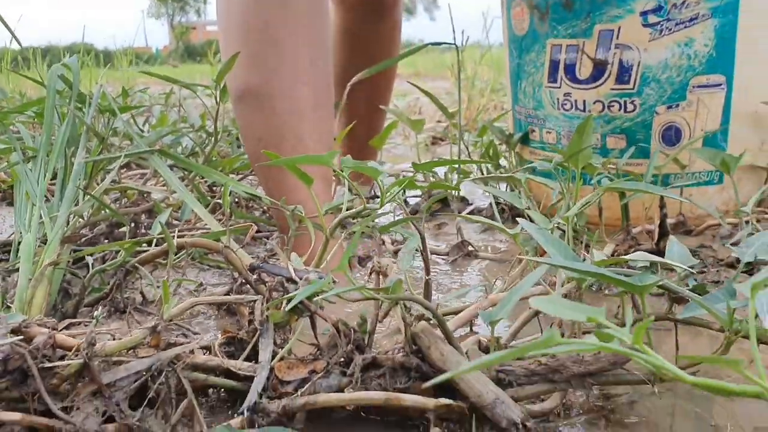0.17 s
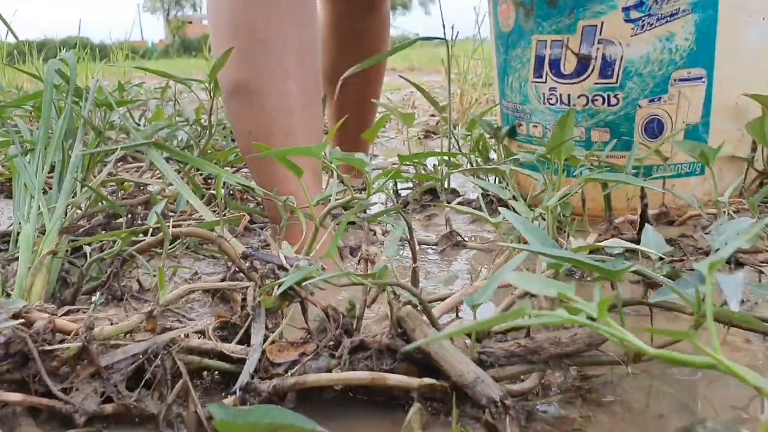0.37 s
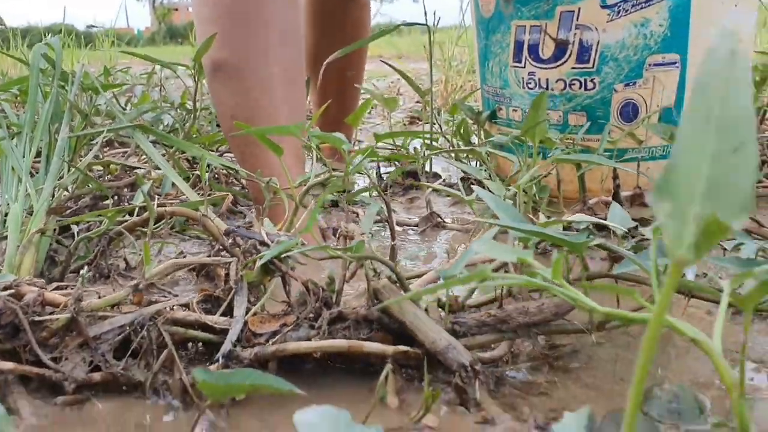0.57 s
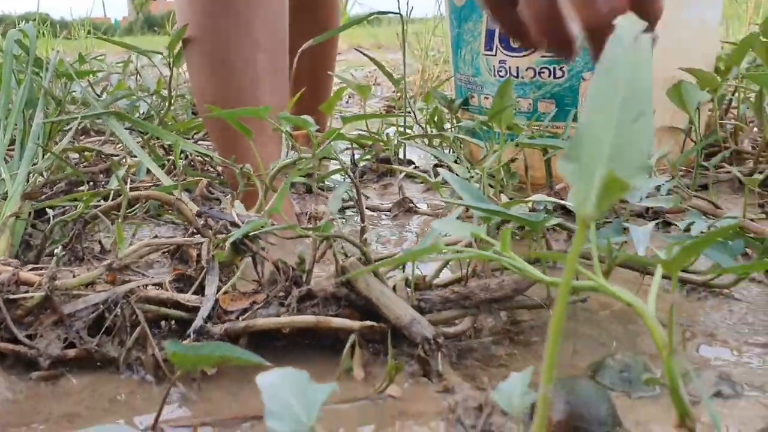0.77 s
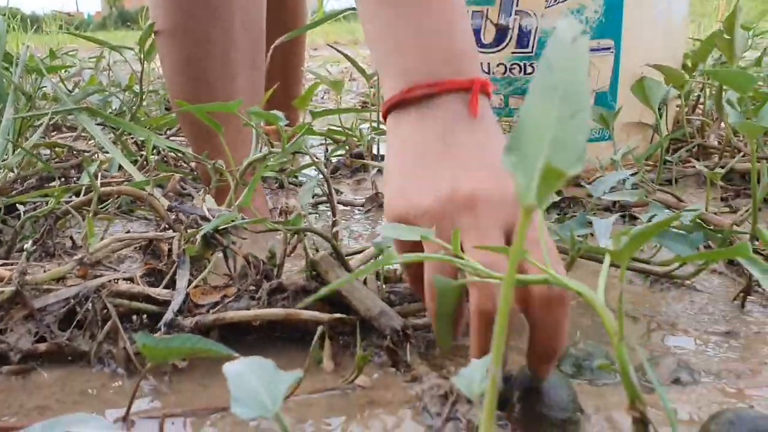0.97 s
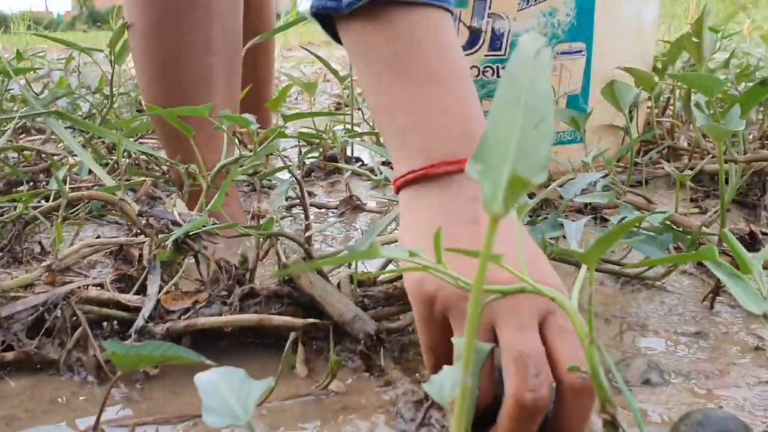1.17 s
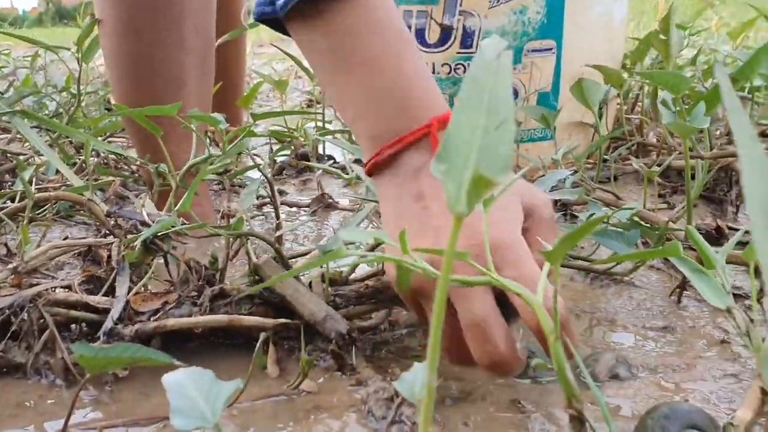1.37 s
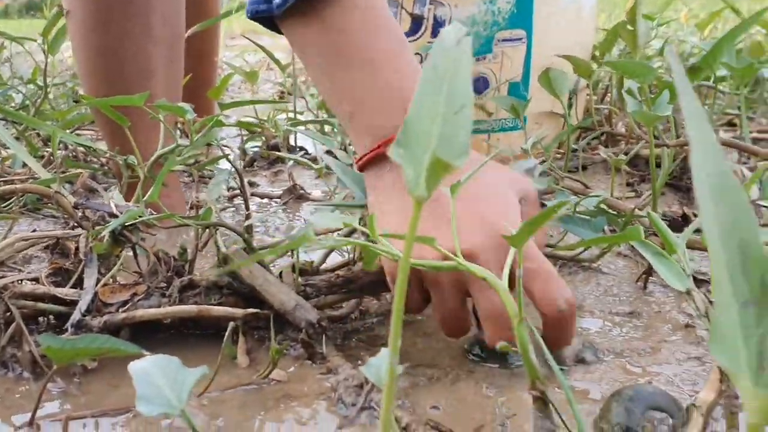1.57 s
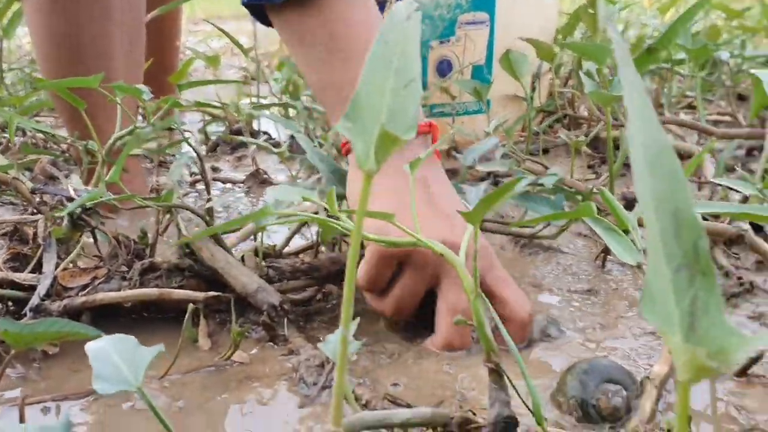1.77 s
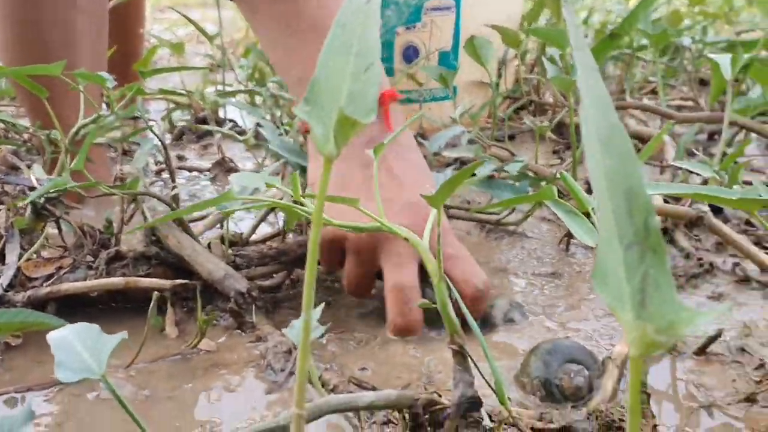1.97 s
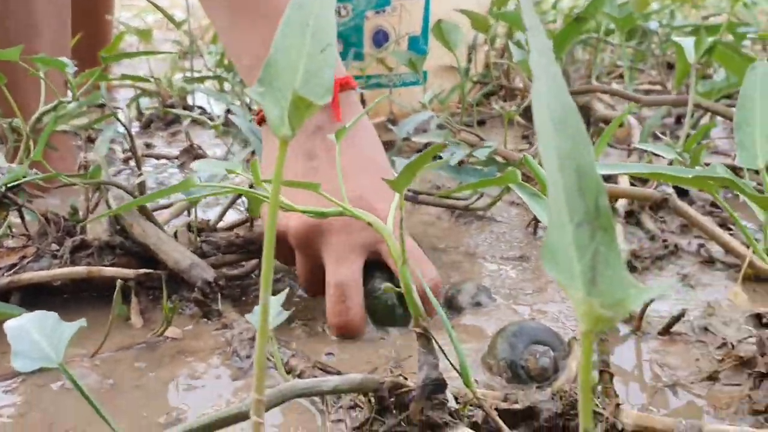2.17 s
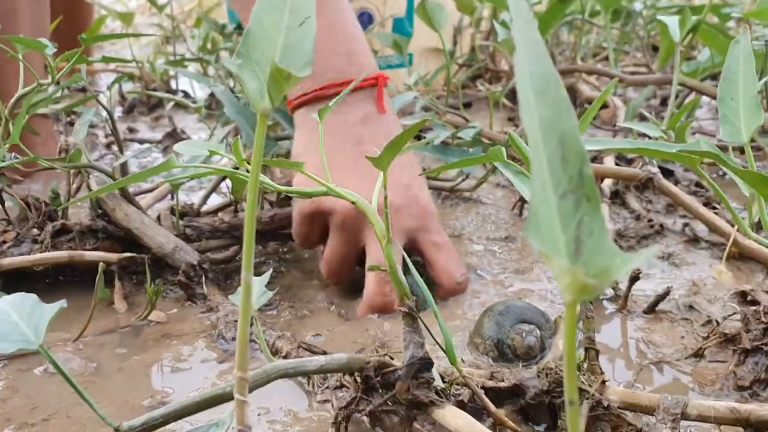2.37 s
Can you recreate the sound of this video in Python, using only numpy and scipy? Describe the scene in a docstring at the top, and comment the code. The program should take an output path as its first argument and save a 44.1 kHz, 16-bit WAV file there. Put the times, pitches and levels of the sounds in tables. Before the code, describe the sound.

A hand plunges into shallow muddy water with one short hollow splash, over low outdoor rumble

```python
"""A low rumble, open-air hiss and a faint pulsing insect lie under the fine rustle of wet mud and stalks.
Close to the ground, a hand makes one short splash in shallow muddy water: hollow falling sine plops,
noise slaps and gushes of spray. Then the fingers stir the mud, which ticks and lets go small bubbles.
Steady beds and wet grit are coloured noise and clicks; plops, low bumps, pings, bubbles and droplets
are sines."""
import sys
import numpy as np
from scipy import signal
from scipy.fft import rfft, irfft
from scipy.io import wavfile
from scipy.ndimage import uniform_filter1d

SR = 44100
rng = np.random.default_rng(int(sys.argv[2]) if len(sys.argv) > 2 else 0)


def log_audio(samples):
    """Write samples as a 16-bit WAV file to the path given in sys.argv[1]."""
    # one column per channel
    frames = np.atleast_2d(samples).T
    # limit to full scale, then quantise
    limited = np.clip(frames, -1, 1)
    pcm = np.round(limited * 32767).astype(np.int16)
    wavfile.write(sys.argv[1], SR, pcm)


N = 105840
T = np.arange(N) / SR
OPPOSITE = np.array([[1], [-1]])  # left and right in opposite polarity
WIDE_LIKENESS = 0.05  # left-right correlation of air, rustle and spray
PLOP_PAN_DB, WET_PAN_DB, FIELD_PAN_DB = -4, -1.5, -3  # left level minus right level
LARGE_SWELL_S = 0.0049  # onset of the plops and of the larger bubble


def from_db(db):
    """Turn decibels into gain."""
    return 10 ** (np.asarray(db) / 20)


def rms_one(x):
    """Scale to unit rms."""
    return x / np.sqrt(np.mean(x ** 2) + 1e-20)


def pan(db):
    """Give left and right gains for a level difference; positive leans left."""
    return from_db(db * OPPOSITE / 2)


def spread(pair, likeness):
    """Blend two unrelated signals into a left and right with the given correlation."""
    shared = np.sqrt(1 + likeness) * pair[0]
    apart = np.sqrt(1 - likeness) * pair[1] * OPPOSITE
    return (shared + apart) / np.sqrt(2)


def band(x, low_hz, high_hz):
    """Pass a band with gentle slopes."""
    return signal.sosfilt(signal.butter(2, [low_hz, high_hz], "band", fs=SR, output="sos"), x)


def colour(x, points):
    """Shape a steady signal's spectrum, falling away beyond the end points; rms 1."""
    hz, db = np.transpose(points)
    log_hz = np.log(np.maximum(np.arange(N // 2 + 1) * SR / N, 1))
    below = np.maximum(np.log(hz[0]) - log_hz, 0)
    above = np.maximum(log_hz - np.log(hz[-1]), 0)
    curve_db = np.interp(log_hz, np.log(hz), db) - 14.0 * (below + above)
    return rms_one(irfft(rfft(x) * from_db(curve_db), N))


def dying(t, t60):
    """Decay exponentially by 60 dB in t60 seconds, held at 1 before t = 0."""
    return np.exp(-np.log(1000) * np.maximum(t, 0) / t60)


def add(out, start_s, sound):
    """Mix a sound in at its start time."""
    i = int(start_s * SR)
    out[:, i:i + sound.shape[-1]] += sound[..., :N - i]


def noise_pair():
    """Make two unrelated white noises."""
    return rng.standard_normal((2, N))


def grains(per_s):
    """Make two trains of random clicks of uneven size and either polarity."""
    extra_db = 2 * np.minimum(rng.exponential(1, (2, N)), 5)
    sizes = from_db(extra_db) * rng.choice([-1, 1], (2, N))
    return sizes * (rng.random((2, N)) < per_s / SR)


def droplets(per_s, low_hz, high_hz, level_db):
    """Ring tiny sine droplets at random times, each with its own size, pitch and stereo phase."""
    out, t = np.zeros((2, N)), T[:SR // 40]
    for when, pitch, size, side in rng.random((int(per_s * N / SR), 4)):
        hz = low_hz * (high_hz / low_hz) ** pitch
        ring = np.sin(2 * np.pi * hz * t + side * OPPOSITE)
        add(out, when * T[-1], size ** 2 * ring * dying(t, 16 / hz))  # 60 dB down in 16 cycles
    return from_db(level_db) * rms_one(out)


def spatter(size):
    """Scatter separate drop impacts in a little hiss, left and right."""
    impacts_per_s, impact_share = 2500, 0.73
    hits = rng.random((2, size)) < impacts_per_s / SR
    impacts = rms_one(rng.standard_normal((2, size)) * hits)
    hiss = rng.standard_normal((2, size))
    return spread(impact_share * impacts + (1 - impact_share) * hiss, likeness=0.057)


# spectrum of the low rumble: frequency_hz, relative density_db (per Hz)
RUMBLE_SPECTRUM = [(12, -53), (25, -21), (38, -8.5), (53, 2.5), (80, -1), (118, 0.5), (150, -6), (180, -19),
                   (260, -23.5), (400, -21.5), (600, -83)]
# spectrum of the wide hush: frequency_hz, relative density_db (per Hz)
HUSH_SPECTRUM = [(300, -2), (365, 6), (560, 3.5), (950, -3), (1500, -14.5)]
# spectrum of the open air: frequency_hz, relative density_db (per Hz)
AIR_SPECTRUM = [(250, 0.5), (400, 3.5), (600, -4.5), (950, -13.5), (1500, -16.5), (3000, -18.5),
                (5500, -22.5), (8500, -21), (11500, -24.5), (15000, -31)]


def field():
    """Three steady coloured noises: a nearly central rumble, wide air, and a hush opposite in the ears."""
    rumble_db, hush_db, air_db = -42.5, -57, -56.5
    rumble = from_db(rumble_db) * colour(spread(noise_pair(), likeness=0.97), RUMBLE_SPECTRUM)
    hush = from_db(hush_db) * colour(rng.standard_normal(N), HUSH_SPECTRUM) * OPPOSITE
    air = from_db(air_db) * colour(spread(noise_pair(), WIDE_LIKENESS), AIR_SPECTRUM)
    return rumble + hush + air


# two insect notes: pitch_hz, width_hz, level_db (before pulsing and swell), time of one pulse_s,
# pulsing depth (0-1)
INSECT_NOTES = [(9380, 310, -67.5, 1.4, 0.54), (10300, 130, -68.5, 2.14, 1)]


def insect():
    """Two very high narrow noise bands pulse at one rate, growing slowly louder, then holding level."""
    period_s, swell_db_per_s, loudest_s = 0.104, 6.5, 2.2
    out = np.zeros((2, N))
    for pitch_hz, width_hz, level_db, pulse_s, depth in INSECT_NOTES:
        beat = np.cos(2 * np.pi * (T - pulse_s) / period_s)
        dip = 0.5 - 0.5 * np.tanh(2 * beat)
        note = rms_one(band(noise_pair(), pitch_hz - width_hz / 2, pitch_hz + width_hz / 2))
        out += from_db(level_db) * (1 - depth * dip) * note
    return out * from_db(swell_db_per_s * np.minimum(T - loudest_s, 0))


# level of the wet mud and stalks over time: time_s, level_db (of the crackle before panning)
RUSTLE_LEVEL = [(0, -53.5), (.07, -54.5), (.12, -44.5), (.2, -51.5), (.215, -52), (.35, -49), (.41, -52),
                (.48, -47), (.54, -56.5), (.66, -53.5), (.8, -62.5), (1.22, -65), (1.36, -55.5),
                (1.55, -62.5), (1.73, -56.5), (1.83, -64.5), (1.94, -55.5), (2.07, -59.5), (2.4, -73.5)]
# spectrum of the crackle: frequency_hz, relative density_db (per Hz)
RUSTLE_SPECTRUM = [(300, 13), (700, 12.5), (1500, 0.5), (4500, -1.5), (7500, -1), (10000, -8.5),
                   (15000, -11)]


def rustle():
    """Mud and stalks crackle in fine coloured clicks with a trickle of ringing droplets."""
    crackle = colour(spread(grains(per_s=2200), WIDE_LIKENESS), RUSTLE_SPECTRUM)
    trickle = droplets(per_s=74, low_hz=1200, high_hz=8006, level_db=-11.5)  # against the crackle
    level = from_db(np.interp(T, *np.transpose(RUSTLE_LEVEL)))
    return level * (crackle + trickle)


# crisp snaps of stalks and mud: start_s, level_db (before decay and panning)
SNAPS = [(0.065, -47), (0.199, -41), (0.2342, -38.5), (.5050, -43), (0.63, -52), (1.74, -46.5),
         (1.925, -52), (2.23, -52)]


def snaps():
    """Tiny bright cracks: band-passed spatter dying at once."""
    out, t = np.zeros((2, N)), T[:SR // 20]
    for start_s, level_db in SNAPS:
        crack = rms_one(band(spatter(len(t)), low_hz=1500, high_hz=8550))
        add(out, start_s, from_db(level_db) * crack * dying(t, t60=0.034))
    return out * pan(WET_PAN_DB)


# soft low bumps: start_s, peak_db (before panning), pitch_hz
BUMPS = [(0.202, -31.5, 75.4), (0.426, -27.5, 115), (0.482, -30.5, 87), (0.507, -29, 75.5)]


def bumps():
    """A few cycles of low pressure, swelling and fading in a 30 ms bell shape."""
    out, t = np.zeros((2, N)), T[:int(0.03 * SR)]
    for start_s, peak_db, pitch_hz in BUMPS:
        add(out, start_s, from_db(peak_db) * np.hanning(len(t)) * np.sin(2 * np.pi * pitch_hz * t))
    return out * pan(PLOP_PAN_DB)


# wet slaps and ticks: start_s, level_db (before shaping and panning), centre_hz, t60_s
SLAPS = [(0.2314, -24.5, 2430, 0.032), (0.2736, -26, 1660, 0.066), (0.2743, -10.5, 720, 0.023),
         (0.297, -18, 1310, 0.072), (0.3024, -23, 1820, 0.053), (0.306, -20, 2340, 0.042),
         (0.3157, -19.5, 1980, 0.05), (0.3218, -19, 1980, 0.0093), (0.3333, -31.5, 1350, 0.091),
         (0.353, -31.5, 1940, 0.038), (.3590, -9.5, 474, 0.012), (0.364, -36.5, 2600, 0.037),
         (0.4209, -18.5, 840, 0.024), (0.421, -41.5, 2620, 0.083), (0.5038, -38, 1060, 0.017),
         (1.03, -51, 620, 0.019), (0.568, -44, 890, 0.088), (0.607, -47, 756, 0.3),
         (0.636, -49, 1470, 0.019), (0.675, -55, 1710, .02), (0.751, -48.5, 1690, 0.015),
         (.7525, -39, 504, 0.05), (1.7259, -27.5, 385, 0.012), (1.725, -40.5, 3300, 0.026),
         (1.739, -42.5, 3280, 0.043), (1.9610, -42.5, 1090, 0.016), (2.144, -48.5, 2500, 0.016),
         (2.203, -46, 2140, 0.014)]


def slaps():
    """Each wet contact is a short noise burst with a weak wash behind it, softened in the treble."""
    half_width, rise_s = 1.347, 0.00049  # half width as a frequency ratio
    wash_db, wash_t60_s = -22, 0.28
    out, t = np.zeros((2, N)), T[:SR // 4]
    soften = signal.butter(3, 3730, fs=SR, output="sos")
    for start_s, level_db, centre_hz, t60_s in SLAPS:
        noise = band(spatter(len(t)), centre_hz / half_width, centre_hz * half_width)
        noise = rms_one(signal.sosfilt(soften, noise))
        # even out the level so that the envelope alone shapes the burst
        power = uniform_filter1d(np.mean(noise ** 2, axis=0), size=300)
        noise = noise / np.sqrt(power + 1e-9)
        burst = dying(t - 2 * rise_s, t60_s)
        wash = from_db(wash_db) * dying(t, wash_t60_s)
        shape = np.minimum(t / rise_s, 1) * (burst + wash)
        add(out, start_s, from_db(level_db) * noise * shape)
    return out * pan(WET_PAN_DB)


# hollow plops: start_s, level_db (before panning), pitch_hz (settled), t60_s,
# overtones_db (offset for the ring table), fall_hz (starting pitch above the settled one)
PLOPS = [(0.233, -27.5, 277, 0.013, -19.5, 109), (0.2747, -6, 276, 0.058, -20, 350),
         (.2880, -13, 220.6, 0.19, -24, -2), (0.2972, -22, 224, 0.09, -17, 93),
         (0.3156, -10, 235.8, 0.12, -6, 180), (0.3602, -7.5, 227, 0.093, -15, 98),
         (.4230, -5.5, 241, 0.033, -19, 284), (0.441, -27, 239, 0.073, -32.5, -11),
         (0.456, -21, 235, 0.056, -40, 2), (.5040, -31, 240, 0.044, -33.5, 100),
         (0.544, -28, 238, 0.048, -37, 100), (.5590, -21.5, 229.6, 0.12, -32, 219),
         (0.6, -21, 226, 0.038, -39, 114), (.6340, -30.5, 225, 0.063, -41, 104),
         (0.7511, -44.5, 253, 0.058, -41.5, 102), (.7970, -35.5, 234, 0.073, -46, 297),
         (0.935, -42.5, 236, 0.074, -55, -2)]
# overtones of the hollow: pitch_hz, level_db (added to overtones_db), t60_s
OVERTONES = [(562, 1.5, 0.048), (646, 2, 0.011), (701.6, -11.5, 0.12), (826, -10, 0.035),
             (989, -16.5, 0.087), (1080, -15.5, 0.087), (1169, -15.5, 0.075), (1507, -20, 0.078),
             (1756, -21.5, 0.037)]


def plops():
    """Each plop glides quickly onto a low hollow note and sets the overtones ringing."""
    glide_s, left_lag_s, overtone_rise_s = 0.0015, 0.000054, 0.0011
    out, t = np.zeros((2, N)), T[:SR // 4]
    ear_t = t - np.array([[left_lag_s], [0]])
    for start_s, level_db, pitch_hz, t60_s, overtones_db, fall_hz in PLOPS:
        glide_cycles = fall_hz * glide_s * (1 - np.exp(-t / glide_s))
        cycles = pitch_hz * ear_t + glide_cycles
        swell = np.minimum(t / LARGE_SWELL_S, 1) * dying(t - LARGE_SWELL_S, t60_s)
        sound = from_db(level_db) * swell * -np.sin(2 * np.pi * cycles)
        for mode_hz, mode_db, mode_t60_s in OVERTONES:
            # the ears' phases differ less below 760 Hz
            apart = rng.uniform(-1.24, 0.7) * min(mode_hz / 760, 1) * OPPOSITE
            ring = np.sin(2 * np.pi * (mode_hz * t + rng.random()) + apart)
            envelope = dying(t, mode_t60_s) * np.minimum(t / overtone_rise_s, 1)
            gain = from_db(overtones_db + mode_db + rng.normal(0, 1))
            sound = sound + gain * ring * envelope
        add(out, start_s, sound)
    return out * pan(PLOP_PAN_DB)


# small wet pings and bubbles: start_s, peak_db (before onset, decay and panning),
# pitch_hz (at the start), rise (octaves per s), t60_s, pan_db (left over right)
PINGS_AND_BUBBLES = [(.233, -19.5, 1726, 0.89, 0.029, -5), (0.234, -33.5, 5550, 8, 0.017, -3),
                     (.753, -41, 1620, 1, 0.022, 3), (.754, -50.5, 2840, 1, 0.035, -8),
                     (0.706, -48, 3060, 45, 0.025, -6), (0.933, -42, 2130, 25, 0.012, -1),
                     (1.320, -47.5, 1107, 14.4, 0.11, -1), (1.347, -53.5, 2270, 45, 0.084, 0),
                     (1.396, -48, 1410, 31, 0.021, 4), (1.7252, -24, 2940, 14, 0.0085, 2),
                     (1.7270, -27, 3760, 16, 0.013, 0), (1.7400, -26, 3110, 5, 0.0082, -3),
                     (2.2035, -31.5, 2170, 12, 0.018, 6)]


def pings_and_bubbles():
    """Small wet pings and bubbles ring briefly, many rising in pitch."""
    out, t = np.zeros((2, N)), T[:SR // 20]
    for start_s, peak_db, pitch_hz, rise, t60_s, pan_db in PINGS_AND_BUBBLES:
        phase = 2 * np.pi * np.cumsum(pitch_hz * 2 ** (rise * t)) / SR
        ring = np.sin(phase + 0.4 * OPPOSITE)
        envelope = np.minimum(t / 0.0007, 1) * dying(t, t60_s)
        add(out, start_s, from_db(peak_db) * ring * envelope * pan(pan_db))
    return out


# gushes of fine spray: start_s, level_db (of the fine drops before panning), swell_s, t60_s
GUSHES = [(0.2719, -29, 0.005, 0.053), (0.288, -32.5, 0.008, 0.12), (.3035, -25, 0.0037, 0.074),
          (0.316, -39.5, 0.0038, 0.08)]
# spectrum of the fine drops: frequency_hz, relative density_db (per Hz)
SPRAY_SPECTRUM = [(1500, 0), (3000, 10.5), (4500, 2), (5700, -4.5), (6800, 1.5), (9500, -12), (15000, -7)]


def spray():
    """Fine click-like drops and ringing droplets gush as the hand drives into the water."""
    level = np.zeros(N)
    for start_s, level_db, swell_s, t60_s in GUSHES:
        swell = np.clip((T - start_s) / swell_s, 0, 1)
        level += from_db(level_db) * swell * dying(T - start_s - swell_s, t60_s)
    fine = colour(spread(grains(per_s=11000), WIDE_LIKENESS), SPRAY_SPECTRUM)
    ringing = droplets(per_s=904, low_hz=1192, high_hz=4007, level_db=3)  # against the fine drops
    return level * (fine + ringing) * pan(WET_PAN_DB)


# one larger bubble: start_s, peak_db (before onset and decay), pitch_hz (at the start),
# rise (octaves per s), t60_s
GLOOP = (0.3, -42, 800, 21, 0.2)


def gloop():
    """One larger bubble slides up in pitch, opposite in the two ears."""
    start_s, peak_db, pitch_hz, rise, t60_s = GLOOP
    out, t = np.zeros((2, N)), T[:SR // 20]
    phase = 2 * np.pi * np.cumsum(pitch_hz * 2 ** (rise * t)) / SR
    envelope = np.minimum(t / LARGE_SWELL_S, 1) * dying(t, t60_s)
    add(out, start_s, from_db(peak_db) * np.sin(phase) * envelope * OPPOSITE)
    return out


def scene():
    """Mix the splash and the stirred mud in front of the field."""
    background = (field() + insect() + rustle()) * pan(FIELD_PAN_DB)
    knocks = snaps() + bumps() + slaps()
    water = plops() + pings_and_bubbles() + spray() + gloop()
    return background + knocks + water


def record(dry):
    """Round the highest peaks and cut the top steeply above 15.9 kHz."""
    rounded = dry / (1 + dry ** 6) ** (1 / 6)
    top_cut = signal.ellip(12, 0.1, 90, 15900, fs=SR, output="sos")
    return signal.sosfilt(top_cut, rounded)


dry = scene()
out = record(dry)
log_audio(out)
```